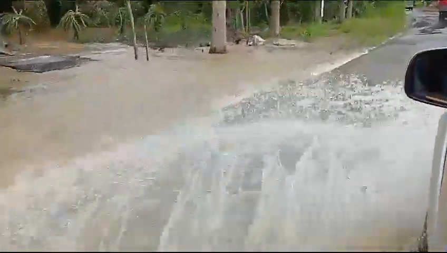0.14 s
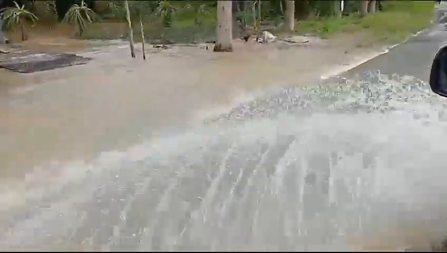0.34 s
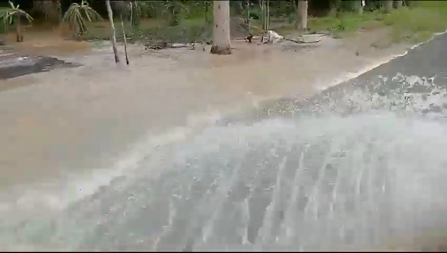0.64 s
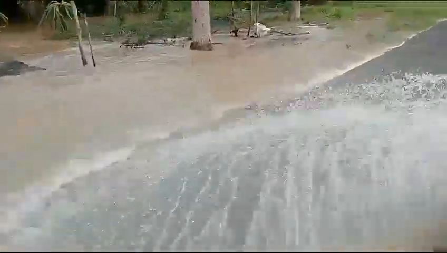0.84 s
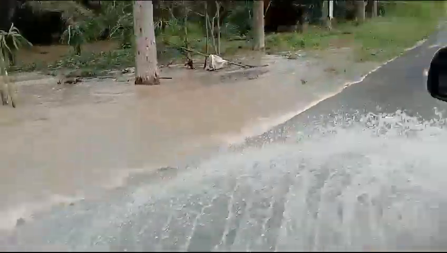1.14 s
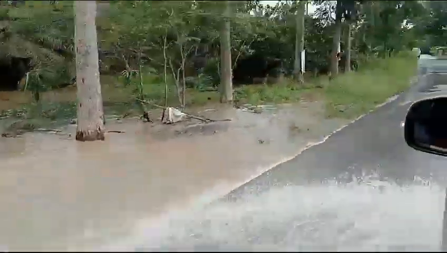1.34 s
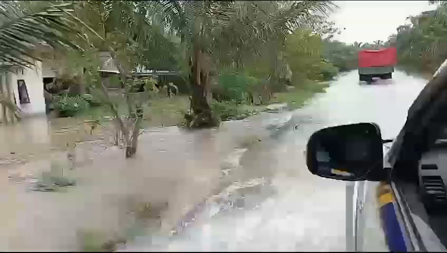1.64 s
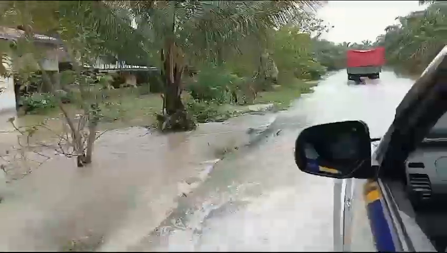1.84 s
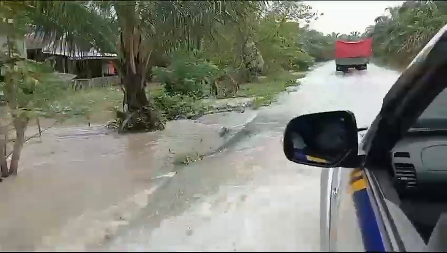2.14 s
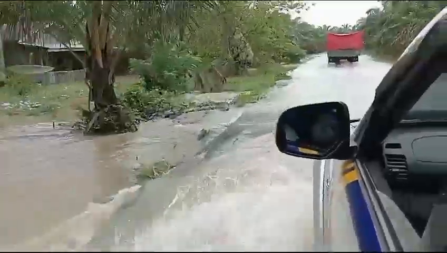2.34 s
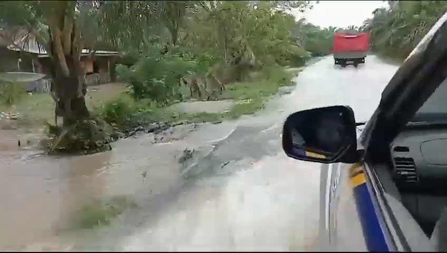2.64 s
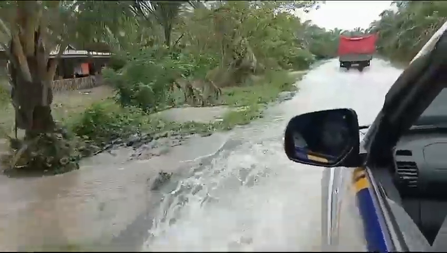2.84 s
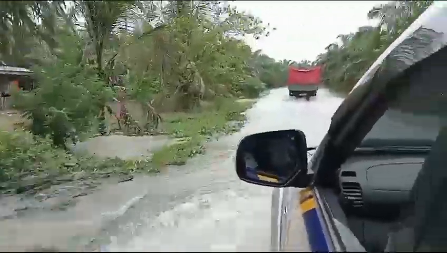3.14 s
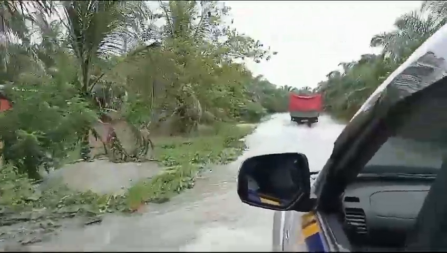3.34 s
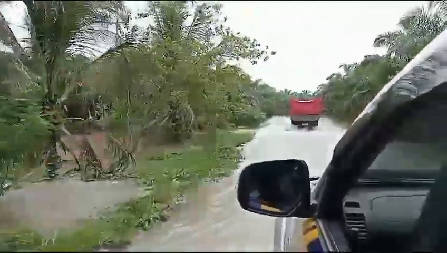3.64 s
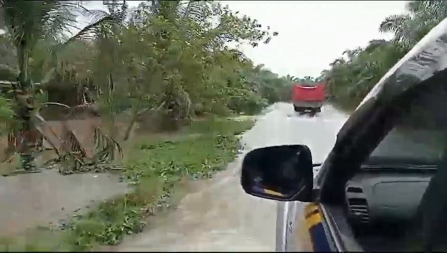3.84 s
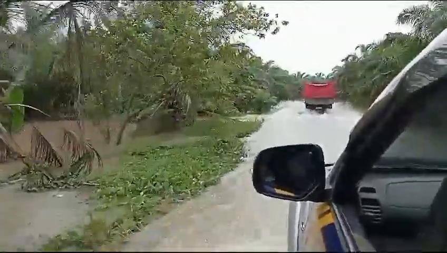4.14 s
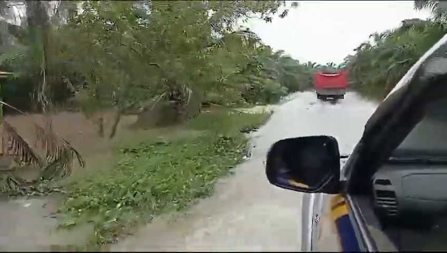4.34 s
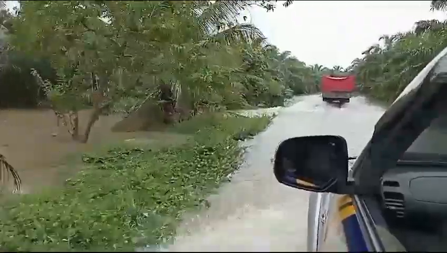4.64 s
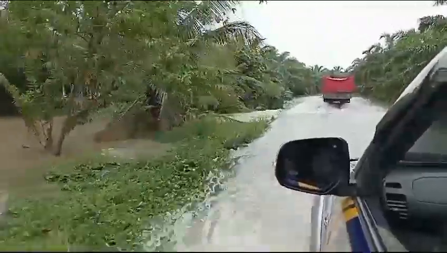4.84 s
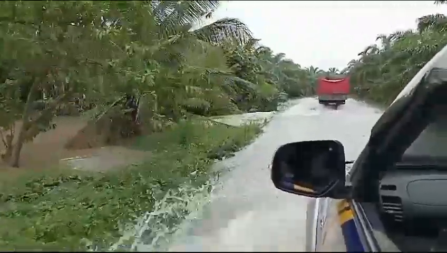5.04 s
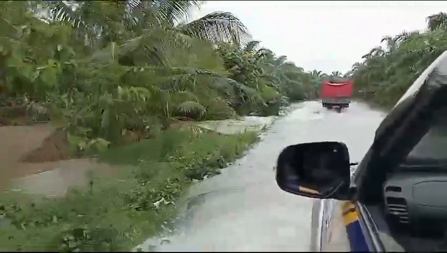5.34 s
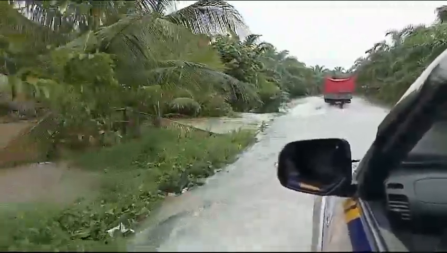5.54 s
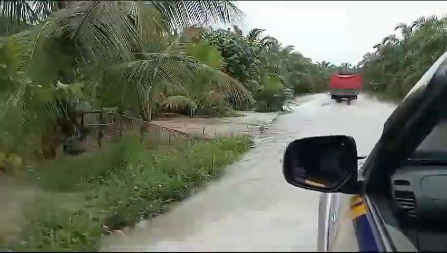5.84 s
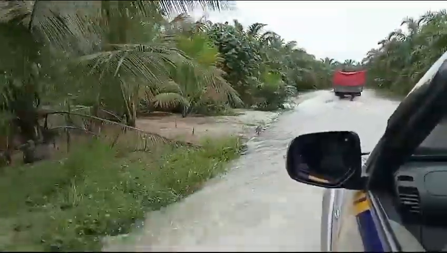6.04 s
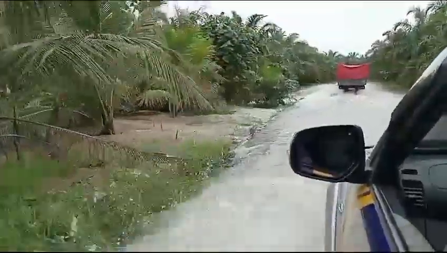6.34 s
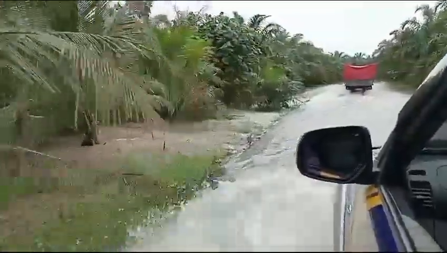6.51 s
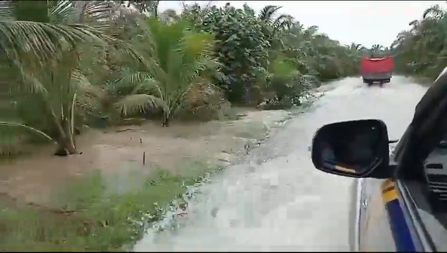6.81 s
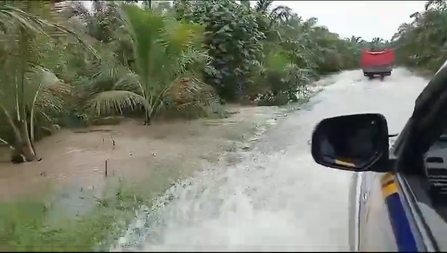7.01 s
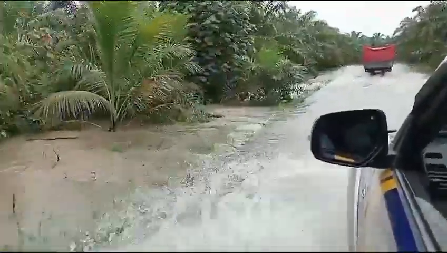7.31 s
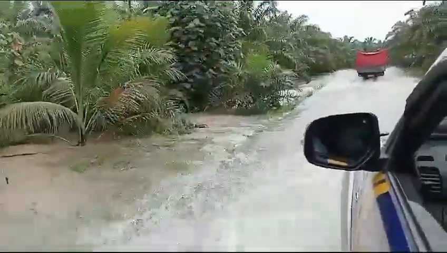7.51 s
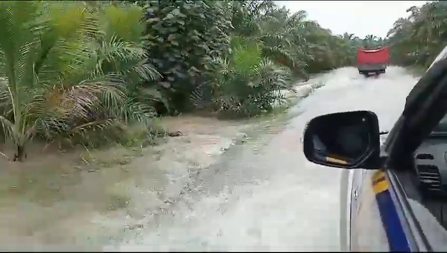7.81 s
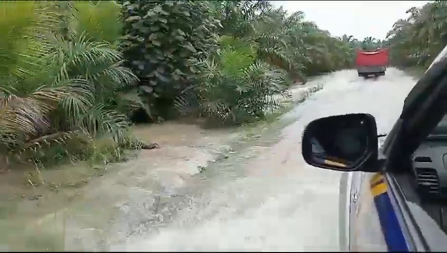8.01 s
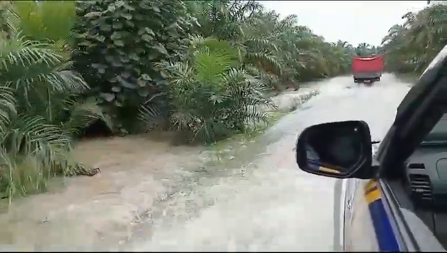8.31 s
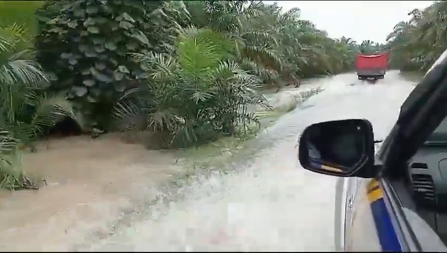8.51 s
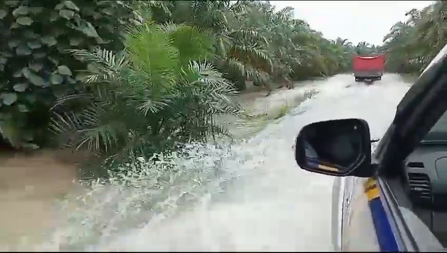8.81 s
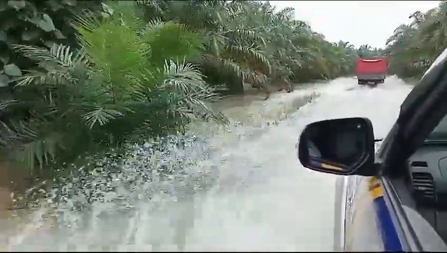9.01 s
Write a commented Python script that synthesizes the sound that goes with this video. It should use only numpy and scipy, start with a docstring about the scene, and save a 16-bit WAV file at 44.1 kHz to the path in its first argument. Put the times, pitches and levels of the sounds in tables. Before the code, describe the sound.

A car drives through floodwater with a surging wash of spray, road rumble and wind thuds, the sound briefly cutting out early on.

```python
"""A sheet of water roars off a car's front tyre and patters back down on a flooded road.
Heard from the open side window, it is a surging wash of splashes, drops and ringing bubbles.
Under it sit a low engine hum and road rumble, while gusts of wind thud on the microphone.
Early on, all sound drops out for half a second."""
import sys
import numpy as np
from scipy import signal
from scipy.fft import rfft, irfft
from scipy.io import wavfile
from scipy.ndimage import uniform_filter1d, minimum_filter1d

SR = 44100
rng = np.random.default_rng(int(sys.argv[2]) if len(sys.argv) > 2 else 0)


def inscribe(sig):
    """Save sig as 16-bit PCM at rate SR to the path in sys.argv[1].

    A 1-D sig is mono; a 2-D sig holds one channel per row.
    Samples are clipped to [-1, 1] before scaling.
    """
    pcm = np.round(np.clip(np.atleast_2d(sig).T, -1, 1) * 32767)
    wavfile.write(sys.argv[1], SR, pcm.astype(np.int16))


N = 403948
TIME = np.arange(N) / SR
FREQS = np.fft.rfftfreq(N, 1 / SR)


def gain_of(db):
    """Decibels to amplitude."""
    return 10 ** (np.asarray(db) / 20)


def unit_rms(x):
    """Scales to rms 1."""
    return x / np.sqrt(np.mean(x ** 2) + 1e-20)


def band_rms(spectrum, low_hz, high_hz):
    """Rms of the part of a sound that lies in a band."""
    return np.sqrt(2) * np.linalg.norm(spectrum[(FREQS > low_hz) & (FREQS < high_hz)]) / N


def fader(points, at=TIME):
    """Reads a level curve at the given times."""
    return np.interp(at, *np.transpose(points))


def bell(x, centre, width):
    """A smooth bump of height 1."""
    return np.exp(-((x - centre) / width) ** 2)


def eq_curve(colour):
    """Gain of a colour table at every frequency."""
    hz, db = np.transpose(colour)
    return gain_of(np.interp(np.log(FREQS + 1), np.log(hz), db))


def filtered(x, gain):
    """Applies a gain at every frequency."""
    return irfft(rfft(x) * gain, N)


def coloured_noise(colour):
    """Noise of rms 1 with the given colour."""
    return unit_rms(filtered(rng.standard_normal(N), eq_curve(colour)))


def wander(rate_hz):
    """Smooth random movement of rms 1, rolling off above the rate."""
    band = bell(FREQS, 0, rate_hz) * (FREQS > rate_hz / 10)
    return unit_rms(filtered(rng.standard_normal(N), band))


def add(mix, start_s, sound):
    """Mixes a sound in from its start time."""
    start = round(start_s * SR)
    sound = sound[max(-start, 0):]
    part = mix[max(start, 0):][:len(sound)]
    part += sound[:len(part)]


# Tyres and body rumbling on the road. Each row: frequency in Hz, relative level in dB.
ROAD_EQ = [(25, -22), (50, 0.5), (90, -7), (150, 0), (240, -3), (350, -0.5), (460, -4), (650, -8),
           (1100, -13.5), (6000, -68.5)]
def engine_and_road(firing_hz=118.0, hum_db=-37, throb_db=6.0, road_db=-31):
    """The engine's wavering firing note and its octave throb in a bed of road rumble."""
    phase = 2 * np.pi * np.cumsum(firing_hz * (1 + 0.039 * wander(9.1))) / SR
    hum = unit_rms(np.sin(phase) + 0.17 * np.sin(2 * phase))
    engine = gain_of(hum_db + throb_db * wander(9.7)) * hum
    return engine + gain_of(road_db) * coloured_noise(ROAD_EQ)


# Turbulence at the microphone. Each row: frequency in Hz, relative level in dB.
DRAUGHT_EQ = [(20, -33), (35, -34), (55, -12), (80, -0.5), (135, 3.5), (200, -2.5), (320, -10), (500, -19),
              (900, -22), (2000, -51.5), (8000, -87.5)]
# Strength of the airflow. Each row: time in seconds, level in dB.
AIRFLOW = [(0.0, -32), (0.76, -21.5), (1.2, -24), (1.4, -36), (2.3, -37.5), (2.65, -25), (3.25, -31),
           (3.5, -23), (3.88, -21.5), (4.35, -29), (4.8, -19), (5.25, -23), (5.55, -18), (5.75, -24),
           (6.3, -18.5), (6.85, -23), (8.65, -19), (8.95, -29)]
def draught(lumpy_db=2.0, brighten=0.43, brisk_db=-19, split_hz=210):
    """Small eddies keep up a lumpy rumble at the microphone port, brighter as the air speeds up."""
    level_db = fader(AIRFLOW) + lumpy_db * wander(41)
    air = coloured_noise(DRAUGHT_EQ)
    lows = filtered(air, 1 / (1 + (FREQS / split_hz) ** 4))
    highs = gain_of(brighten * (level_db - brisk_db)) * (air - lows)
    return gain_of(level_db) * (lows + highs)


def lesser_gusts(per_s=4, above_airflow_db=1.5, spread_db=1, length_s=.014, pitch_hz=190):
    """Eddies ride on the airflow at loose intervals; returns rows like those of HARD_GUSTS."""
    count = int(per_s * N / SR)
    timing, strength, length, pitch = rng.uniform(-1, 1, (count, 4)).T
    times = (np.arange(count) + .5 + .5 * timing) / per_s
    levels_db = fader(AIRFLOW, times) + above_airflow_db + spread_db * strength
    return list(zip(times, levels_db, length_s * 2 ** (.5 * length), pitch_hz * 2 ** (.5 * pitch)))


# The hardest buffets. Each row: crest time in seconds, crest level in dB, nominal length in seconds,
# nominal pitch in Hz.
HARD_GUSTS = [(0.017, -10.5, 0.016, 200), (0.112, -19, 0.015, 170), (0.329, -10.5, .013, 165),
              (0.37, -14, 0.017, 164), (0.468, -12.5, 0.0097, 180), (0.577, -13.5, 0.0083, 300),
              (0.755, -18.5, .031, 220), (0.913, -11.5, 0.016, 130), (0.967, -10.5, 0.013, 215),
              (1.195, -10.5, .02, 145), (1.255, -11, 0.015, 180), (1.644, -22, .014, 170),
              (2.176, -22.5, .009, 250), (3.413, -11, 0.017, 200), (3.858, -11.4, 0.017, 173),
              (3.956, -17, 0.029, 168), (4.635, -12.5, .014, 185), (4.708, -16.5, .025, 160),
              (4.766, -10.5, .015, 195), (4.825, -13.5, 0.018, 197), (4.968, -10, .016, 178),
              (5.011, -14.5, 0.022, 164), (5.164, -13, .016, 184), (5.232, -12.5, 0.016, 168),
              (5.288, -13, 0.033, 250), (5.47, -13.5, 0.028, 238), (5.533, -11.5, 0.035, 140),
              (6.111, -12.4, .012, 170), (6.174, -13.5, .022, 162), (6.273, -6, 0.0081, 238),
              (6.374, -15, 0.028, 328), (6.427, -7.5, .016, 188), (6.538, -12, 0.025, 237),
              (6.793, -12, 0.0082, 172), (6.842, -13, 0.017, 268), (7.036, -10.5, 0.031, 160),
              (7.1, -9.5, 0.015, 210), (7.237, -10.5, 0.011, 234), (7.291, -13, 0.022, 250),
              (7.362, -9.5, .019, 180), (7.407, -10.5, 0.024, 237), (7.477, -12, 0.019, 380),
              (7.69, -11.5, 0.04, 160), (7.882, -8.5, 0.015, 290), (7.921, -8.5, .01, 200),
              (7.982, -11.5, 0.021, 197), (8.048, -12.5, 0.024, 191), (8.255, -10.5, 0.034, 174),
              (8.35, -11, 0.0091, 228), (8.416, -11.5, .011, 165), (8.487, -10, 0.023, 245),
              (8.587, -8.5, 0.02, 200), (8.634, -5, 0.012, 176), (8.751, -10, 0.013, 235),
              (8.989, -14, 0.016, 272), (9.107, -16.5, 0.02, 216)]
def gusts(stretch=0.96, reach=1.8, steepness=3.6, port_hz=68, knee_hz=240, size=8192):
    """Each large eddy is a brief thud of pressure; faster eddies reach higher in pitch."""
    t = (np.arange(size) - size // 2) / SR
    hz = np.fft.rfftfreq(size, 1 / SR)
    low_cut = (hz / port_hz) ** 4 / np.sqrt(1 + (hz / port_hz) ** 8)
    tilt = 1 / np.hypot(1, hz / knee_hz)  # small whirls carry less pressure than large ones
    out = np.zeros(N)
    for crest_s, db, length_s, pitch_hz in HARD_GUSTS + lesser_gusts():
        swell = 1 / np.cosh(np.minimum(abs(1.49 * t / (stretch * length_s)), 20))
        high_cut = 1 / np.hypot(1, (hz / (reach * pitch_hz)) ** steepness)
        eddy = irfft(rfft(rng.standard_normal(size)) * low_cut * tilt * high_cut)
        eddy /= np.sqrt(uniform_filter1d(eddy ** 2, size=500) + 1e-12)  # flat, so the swell shapes it
        thud = irfft(rfft(eddy * swell) * low_cut)
        thud *= np.linalg.norm(swell) / np.linalg.norm(thud)
        add(out, crest_s + t[0], gain_of(db) * thud)
    return out


# Thin pings in the spray. Each row: start in seconds, length in seconds, pitch in Hz, level in dB.
SPRAY_PINGS = [(1.305, .04, 3450, -21), (1.255, .04, 5450, -31)]
def pings():
    """Short, nearly pure tones swell and fade."""
    out = np.zeros(N)
    for start_s, length_s, hz, db in SPRAY_PINGS:
        t = np.arange(0, length_s, 1 / SR)
        add(out, start_s, gain_of(db) * np.hanning(len(t)) * np.sin(2 * np.pi * hz * t))
    return out


def drops(per_s, spread_db, decay_s, rise, pitches, size):
    """Drops of unequal size land at random and ring; pitch climbs by the fraction `rise` per decay."""
    age = np.arange(size) / SR / decay_s
    envelope = np.exp(-age) - np.exp(-4 * age)
    per_pitch = int(per_s / pitches * N / SR) + 1
    out = np.zeros(N)
    for hz in np.linspace(800, 15400, pitches) * rng.uniform(.98, 1.02, pitches):
        strengths = gain_of(spread_db * np.minimum(rng.exponential(1, per_pitch), 4))
        strengths *= rng.choice([-1, 1], per_pitch)
        hits = np.bincount(rng.integers(0, N, per_pitch), strengths, N)
        ring = envelope * np.sin(2 * np.pi * np.cumsum(hz * (1 + rise * age)) / SR)
        out += signal.oaconvolve(hits, ring)[:N]
    return unit_rms(out)


def patches(noise, bins, frames):
    """Blurs a grid of noise across pitch and time into patches of rms 1."""
    return unit_rms(uniform_filter1d(uniform_filter1d(noise, bins, axis=0), frames, axis=1))


# Bands of the spray that swell: brief splashes and longer ringing resonances. Each row: crest time
# in seconds, half-width in seconds, pitch in Hz, half-width in octaves, boost in dB.
BAND_SWELLS = [(.38, 0.25, 4180, .12, 5.5), (1.36, 0.17, 6020, .4, 1.5), (1.55, 0.14, 2390, .15, 3.5),
               (2.824, 0.083, 1680, .1, 1), (4.166, .035, 6380, .35, 4), (4.37, 0.048, 1830, .3, 6),
               (4.505, .02, 4340, 0.13, 3.5), (5.46, 0.035, 4300, 0.16, 1.5), (8.361, 0.15, 1600, .12, 3.5)]
def clumped(water, narrow_db=1.37, wide_db=0.28):
    """The sheet tears into clumps, each briefly favouring a random band; a few bands swell on cue."""
    hz, t, spectrogram = signal.stft(water, SR, nperseg=1024, noverlap=768)
    narrow, wide = rng.standard_normal((2, *spectrogram.shape))
    db = narrow_db * patches(narrow, bins=5, frames=9) + wide_db * patches(wide, bins=60, frames=10)
    for crest_s, width_s, pitch_hz, octaves, boost_db in BAND_SWELLS:
        band = bell(np.log2((hz + 1) / pitch_hz), 0, octaves)
        db += boost_db * np.outer(band, bell(t, crest_s, width_s))
    return signal.istft(spectrogram * gain_of(db), SR, nperseg=1024, noverlap=768)[1][:N]


# Steady flow of water off the tyre. Each row: time in seconds, level in dB.
SHEET_FLOW = [(0.0, -22.5), (0.7, -21.5), (1.6, -20), (2.18, -23), (2.5, -20.5), (4.3, -20.5), (4.95, -21),
              (5.2, -20.5), (5.6, -22), (8.2, -22), (9.15, -24)]
# Surges of deeper water. Each row: crest time in seconds, half-width in seconds,
# gain on the rush in dB, gain on the mist in dB.
DEEP_SURGES = [(.41, .14, 3.0, 3), (1.3, .16, 2.2, 2), (2.744, 0.14, 1.5, 0.3), (3.336, 0.097, -0.5, 2),
               (4.16, .06, 1.8, 2.4), (4.35, .07, 2.4, 1), (4.553, 0.076, 2.5, 2.2), (5.068, .03, 4, 3),
               (5.42, 0.088, 4.5, 5), (5.92, 0.27, 1, 2.5), (6.5, .04, 1.3, 0), (7.064, 0.14, 1, 2.5),
               (7.923, 0.03, -2.5, 4), (8.405, .14, 3.5, 2)]
def surging_flow(heave_db=.5, rush_heave_db=0.53, mist_heave_db=.4, heave_hz=18):
    """Gains of the low rush and the high mist: they surge with the water and heave at random."""
    # the spray is ducked briefly on cue, as when a limiter holds down loud gusts
    duck_db = -6 * bell(TIME, 7.45, 0.1)
    shared_db = fader(SHEET_FLOW) + duck_db + heave_db * wander(heave_hz)
    rush_db = shared_db + rush_heave_db * wander(heave_hz)
    mist_db = shared_db + mist_heave_db * wander(heave_hz)
    for crest_s, width_s, rush_lift_db, mist_lift_db in DEEP_SURGES:
        swell = bell(TIME, crest_s, width_s)
        rush_db += rush_lift_db * swell
        mist_db += mist_lift_db * swell
    return gain_of(rush_db), gain_of(mist_db)


# The spray as door and mirror colour it: microphone leaning out, back by the door, further down
# the road. Each row: frequency in Hz, relative level in dB.
LEANING_OUT_EQ = [(290, -33.5), (500, -11), (638, -6), (803, -8), (862, -4.5), (1040, -6), (1250, -3),
                  (1690, -1), (2460, -6.5), (3000, -14), (3620, -10.5), (4960, -17.5), (5810, -12),
                  (7740, -19.5), (8930, -15), (9870, -22), (13700, -29), (15400, -24)]
BY_THE_DOOR_EQ = [(290, -33), (500, -6.5), (577, -12), (629, -8.5), (695, -9), (1270, -4.5), (1380, -1.5),
                  (1600, -2.5), (2600, -11.5), (2920, -17.5), (3470, -15.5), (4240, -8.5), (5100, -22),
                  (6060, -18), (7200, -22.5), (8680, -17), (12200, -34.5), (15400, -24)]
FURTHER_ON_EQ = [(410, -40), (700, -8), (1240, -4), (1540, 1), (2130, -7.5), (2690, -12), (2980, -20),
                 (3660, -19), (4120, -14.5), (4870, -24), (5540, -23), (7370, -27), (8170, -23),
                 (9180, -22.5), (10300, -33), (12400, -40.5), (15400, -30)]
# Mist against rush in dB, one trim for each of those three positions.
MIST_TRIMS = (-9, -7.5, -7.5)
def spray(patter_db=-3, bubbles_db=-5, slosh_db=0.24, split_hz=3000, bubble_low_cut_hz=2200):
    """The tyre's sheet of water: merged splashes, pattering drops and bubbles, all surging together."""
    patter = drops(per_s=7000, spread_db=2.5, decay_s=0.00025, rise=0, pitches=24, size=256)
    bubbles = drops(per_s=2400, spread_db=3.0, decay_s=0.0086, rise=0.0058, pitches=150, size=2048)
    bubbles = filtered(bubbles, FREQS / np.hypot(FREQS, bubble_low_cut_hz))  # large bubbles are faint
    wash = rng.standard_normal(N)
    water = clumped(wash + gain_of(patter_db) * patter + gain_of(bubbles_db) * bubbles)
    spectrum = rfft(water * gain_of(slosh_db * wander(18)))
    rush_gain, mist_gain = surging_flow()
    low_pass = 1 / (1 + (FREQS / split_hz) ** 8)
    # the microphone moves: the colour switches at the dropout and later crossfades
    pulled_in = TIME > DROPOUT_START_S
    further = np.clip((TIME - 4.7) / 2.5, 0, 1)
    fades = (1 - pulled_in, pulled_in * (1 - further), further)
    colours = (LEANING_OUT_EQ, BY_THE_DOOR_EQ, FURTHER_ON_EQ)
    out = np.zeros(N)
    for colour, fade, trim_db in zip(colours, fades, MIST_TRIMS):
        heard = spectrum * eq_curve(colour)
        rush = irfft(heard * low_pass, N) / band_rms(heard, 900, 2800)
        mist = irfft(heard * (1 - low_pass), N) / band_rms(heard, 3500, 10000)
        out += fade * (rush_gain * rush + gain_of(trim_db) * mist_gain * mist)
    return out


def scene():
    """Water, car and wind at one microphone."""
    return (spray() + pings() + engine_and_road() + draught() + gusts())[None]


DROPOUT_START_S, DROPOUT_END_S = 1.6525, 2.157
def record(dry, ceiling=0.94, high_cut_hz=15520):
    """A fast limiter holds down the gusts, the sound drops out once, and the very top is cut."""
    needed_gain = np.minimum(1, ceiling / (abs(dry[0]) + 1e-9))
    limited = dry * uniform_filter1d(minimum_filter1d(needed_gain, size=400), size=400)
    live = (TIME < DROPOUT_START_S) | (TIME > DROPOUT_END_S)
    low_pass = signal.firwin(1023, high_cut_hz, window=("kaiser", 9), fs=SR)
    return signal.oaconvolve(limited * live, low_pass[None], "same")


dry = scene()
out = record(dry)
inscribe(out)
```